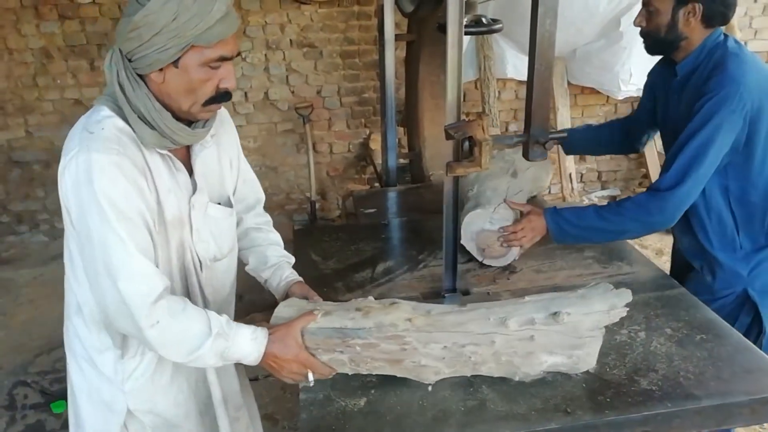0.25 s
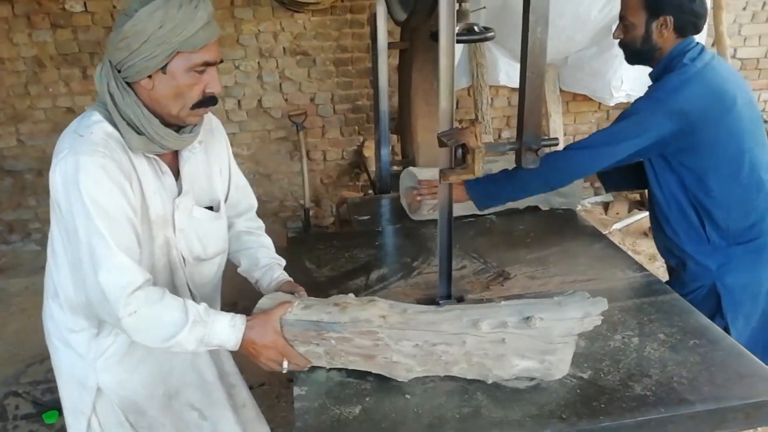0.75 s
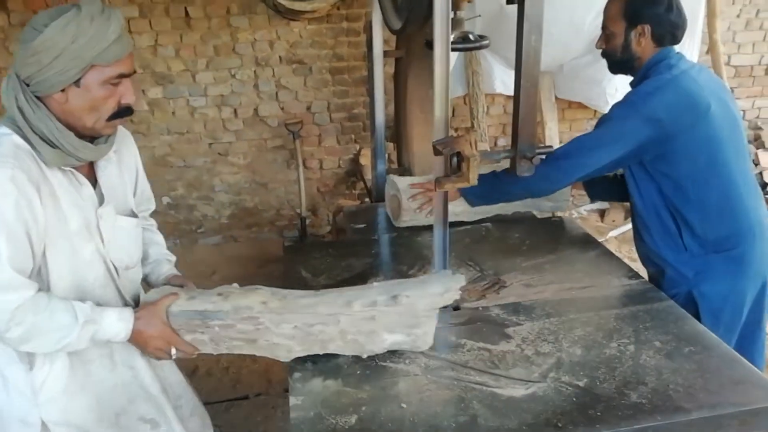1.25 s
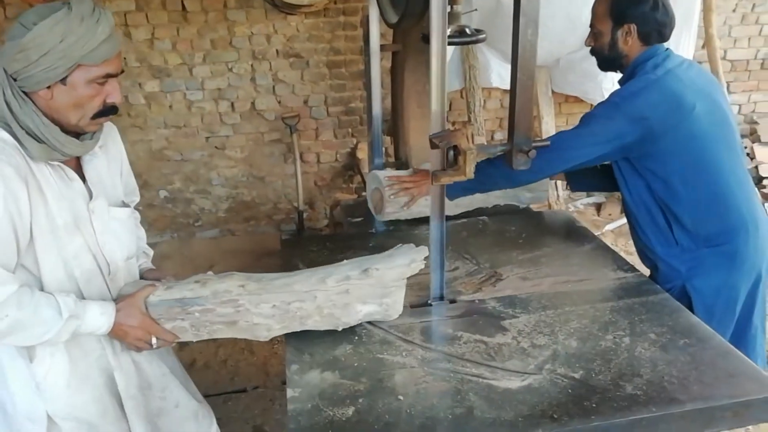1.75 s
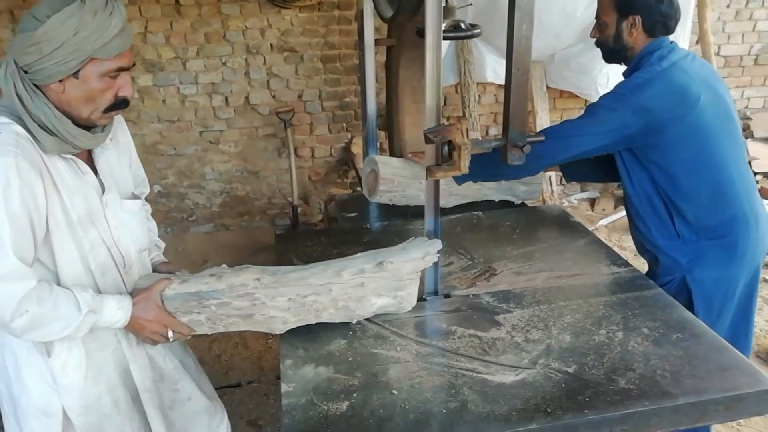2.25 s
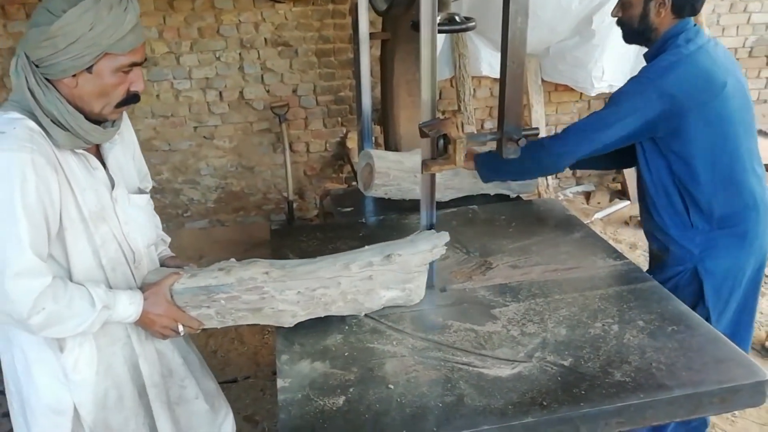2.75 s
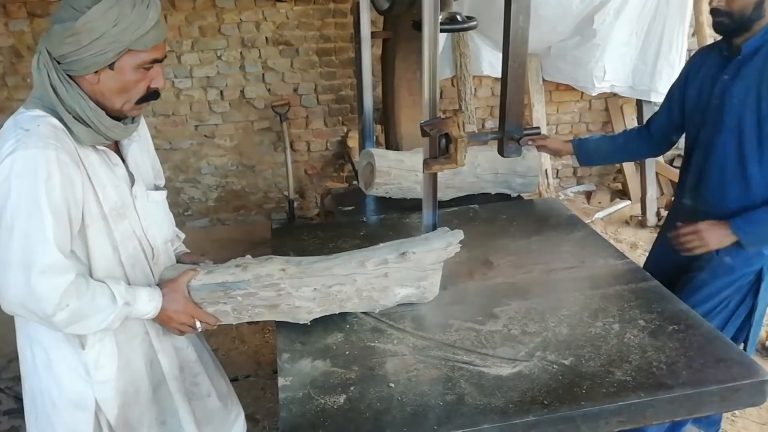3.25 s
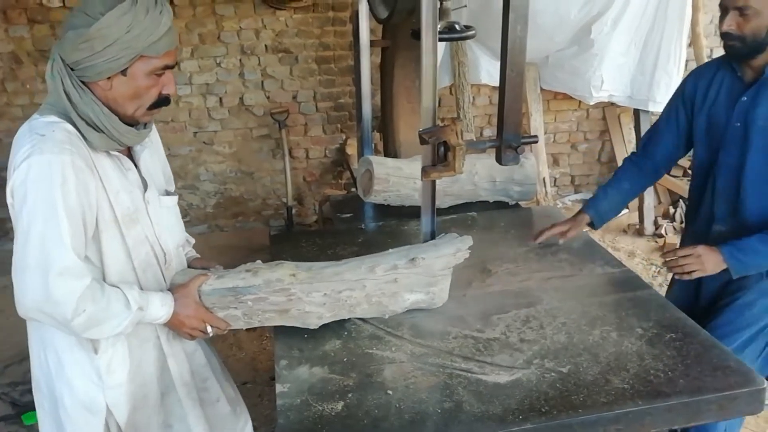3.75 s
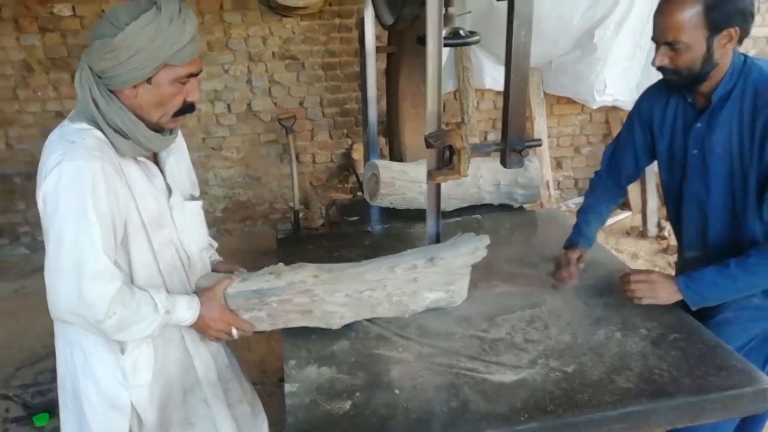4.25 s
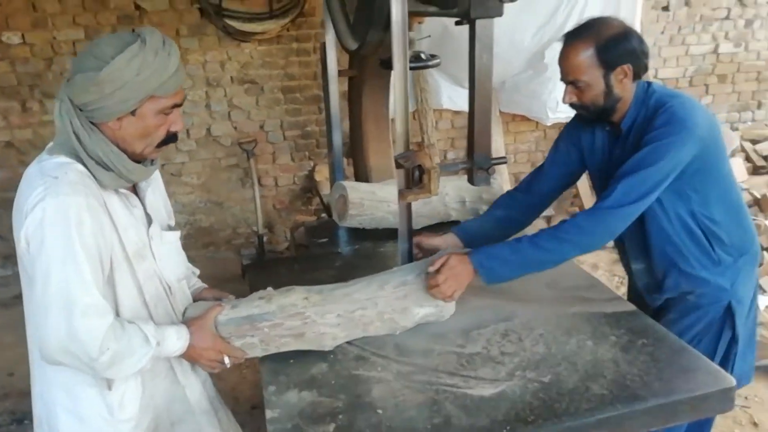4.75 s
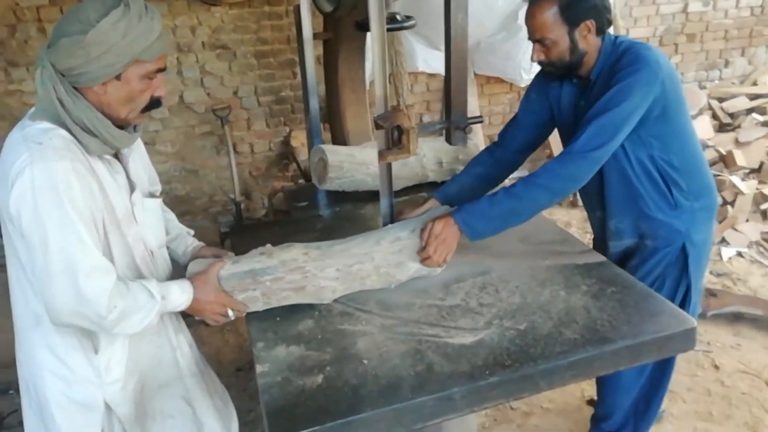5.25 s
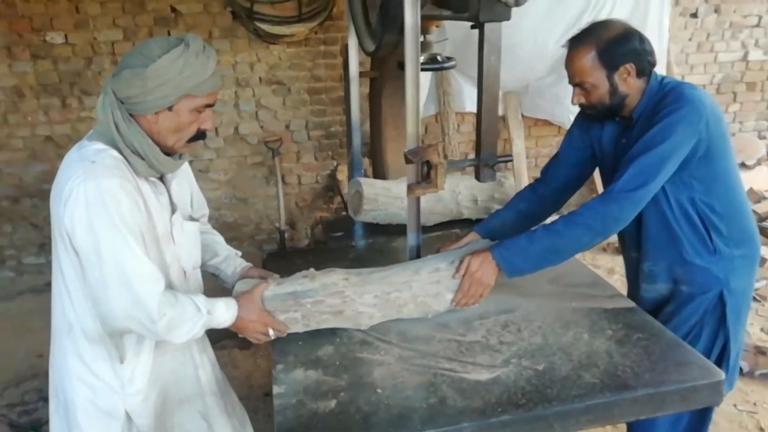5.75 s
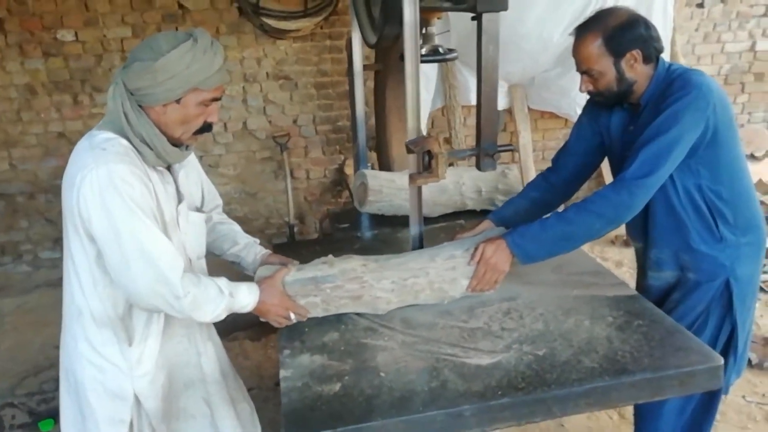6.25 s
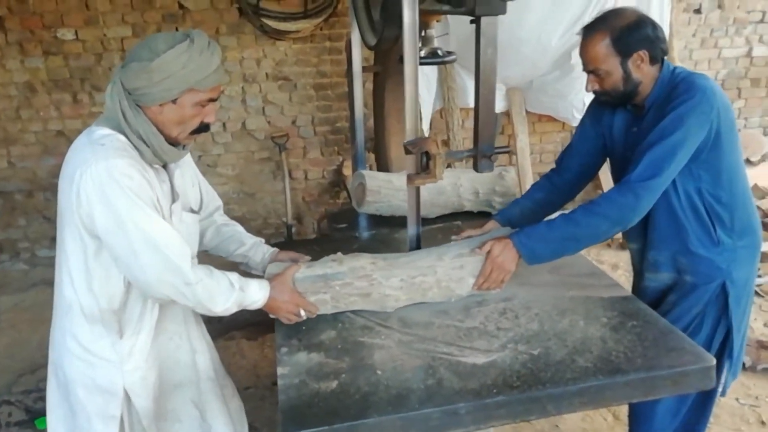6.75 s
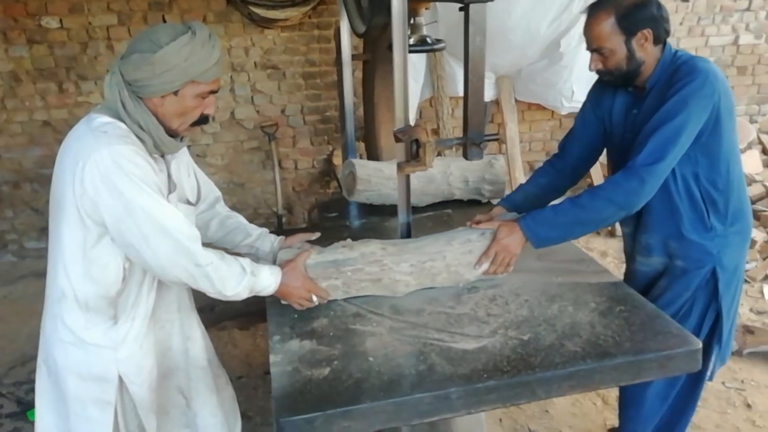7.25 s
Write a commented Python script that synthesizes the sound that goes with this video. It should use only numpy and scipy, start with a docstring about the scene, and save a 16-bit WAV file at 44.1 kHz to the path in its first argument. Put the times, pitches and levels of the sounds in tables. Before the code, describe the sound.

From 0 s a big band saw is already running close by in an open brick shed. Its blade hisses brightly, throbbing roughly eight times a second, and squeals around 3.5 kHz, mostly left, with fleeting pure chirps and a small pitch sag about four times a second. The steel table rings and whistles faintly, guides chatter, and a low drone and hum lie beneath. Soft wooden knocks come near 1.4 and 1.9 s; at 2.3 s the airy hiss opens up brighter, with dull phone bumps at 2.5-2.9 s. The drone climbs until, at 3.87 s, the teeth hit the log with a short hard knock. Squeal drops back; a harsh, grainy rasp around 5-6 kHz takes over on the left, with more central dust spray. A thin tooth whine grows, strongest near 6 s, as the rasp and table briefly ease around 6.25 s. Cutting continues to 7.5 s, slowing slightly.

```python
"""An open brick workshop: a big band saw runs close to a hand-held phone and a log is fed into it.
The blade hisses with each turn of the wheels (filtered noise) and squeals in its guides (shaken resonances
and brief locked tones), sagging in pitch on every lap of its loop. The teeth catch the wood with a knock,
then rasp (noise gated at the tooth rate), whine (its harmonics) and throw dust (bright, grainy noise).
The table rings, the guides chatter, the frame drones, the drive hums, and soft bumps reach the phone."""
import sys
import numpy as np
from scipy import signal
from scipy.fft import rfft, irfft, next_fast_len
from scipy.io import wavfile
from scipy.ndimage import map_coordinates

SR = 44100
rng = np.random.default_rng(int(sys.argv[2]) if len(sys.argv) > 2 else 0)


def to_wav(s):
    """Save 16-bit WAV."""
    ch = np.atleast_2d(s).T  # columns
    pcm = np.round(np.clip(ch, -1, 1) * 32767)  # PCM
    wavfile.write(sys.argv[1], SR, pcm.astype(np.int16))


N = 331169
T = np.arange(N) / SR

# speed of the band wheels, gradually slowing: (time [s], speed [turns/s])
WHEEL_SPEED = [(0, 8.33), (2, 8.23), (3, 8.23), (4, 8.16), (5, 8.1), (6, 7.97), (7.5, 7.9)]
# blade rubbing in its guides, levels before each layer's own gain:
# (time [s], squeal level [dB], squeal left minus right [dB], sliding hiss level [dB])
GUIDE_RUB = [(0, -18.5, 11.5, -27), (2.2, -19.5, 9.5, -26), (3.2, -20, 8.5, -26.5), (4, -26, 8.5, -27.5),
             (5.2, -26.5, 2, -28), (6.2, -26, 8, -31.5), (7.5, -26.5, 5, -29)]
# the phone turns towards the saw: (time [s], delay of the left microphone [ms], table whistle level [dB],
# table ring base level [dB], chatter base level [dB], chatter left minus right [dB])
PHONE_AIM = [(0, 0.14, -40, -33.5, -36, 4), (2.2, 0.13, -41, -34, -35.5, 6),
             (3.7, 0.11, -52, -36.5, -39.5, 4), (4.6, 0.038, -59, -37.5, -38.5, 3),
             (7.5, 0.042, -56, -39, -39, 1)]
# the frame's drone and the drive: (time [s], drone base level [dB], centre [Hz], gain of the hum [dB])
FRAME_DRONE = [(0, -50, 132.1, -4), (2.3, -45.5, 133, -3), (3.3, -43, 164.4, -5.5), (3.95, -38, 190, -6),
               (5.2, -44, 183, 1.5), (6.3, -49, 170.5, -3), (7.5, -44, 167.7, -7.5)]
# the log meets the teeth: time and rise of the cut
BITE_S, BITE_RISE_S = 3.85, 0.034


def wheel_throb(start_turn, second, uneven, flutter, flutter_hz):
    """The wheels run out of true and press the blade into its guides each turn, unevenly; the band flutters."""
    angle = phase(curves(WHEEL_SPEED)[0]) + 2 * np.pi * start_turn
    beat = np.cos(angle) + second * np.cos(2 * angle + 1.9)
    flapping = filtered(rng.standard_normal(N),
                        lambda f: 1 / (1 + (f / flutter_hz - flutter_hz / f) ** 2))
    return beat * (1 + uneven * wander(2)) + flutter * flapping


def lap_angle(at_lap):
    """Angle of the blade round its loop, zero at the given place in the lap (0-1)."""
    laps_per_turn = 0.466  # the blade loop is longer than a wheel's rim
    return laps_per_turn * phase(curves(WHEEL_SPEED)[0]) - 2 * np.pi * at_lap


def lap_throb(at_lap, first, half_at_lap, second):
    """Uneven stretches of the blade rub harder, once and twice a lap."""
    return first * np.cos(lap_angle(at_lap)) + second * np.cos(2 * lap_angle(half_at_lap))


def blade_bend(drift):
    """Relative change of the blade's pitch: a slack stretch sags it each lap, it drifts, and load sharpens it."""
    sag_at_lap, sag_depth, sag_sharpness = 0.78, 0.0371, 1.2  # depth as a share of the pitch
    load_sharp = 0.006  # share of the pitch
    sag = np.exp(sag_sharpness * (np.cos(lap_angle(sag_at_lap)) - 1))
    return -sag_depth * (sag - sag.mean()) + drift * wander(8.52) + load_sharp * load()


def squeal(ring_db, chirp_db, duck_db, flicker_db, ring_bend):
    """Friction shakes the blade's bending modes; in short spells it locks into one sliding tone."""
    # bending modes of the blade: (frequency [Hz], width [Hz], relative level [dB])
    blade_modes = [(3170, 220, -21), (3482, 115, 1.5), (3635, 133, -.3), (3790, 180, -4.5),
                   (4170, 560, -8.5)]
    level_db, side_db, _ = curves(GUIDE_RUB)
    bend = blade_bend(drift=0.002)
    tone, lock = chirps(bend, rough_hz=27, spell_hz=9, chance=0.38,
                        loaded_db=-3.5, loaded_at_lap=0.56, loaded_sharpness=1.8)
    # reading the ringing faster or slower slides the modes by part of the blade's bend
    place = np.cumsum(1 + ring_bend * bend)
    modes = np.array([map_coordinates(side, [place], order=3, mode="mirror")
                      for side in ring(blade_modes, alike=0.68)])
    # while the tone holds, it takes energy from the disorderly ringing
    shaken = modes * undb(ring_db - duck_db * lock + flicker_db * wander(34))
    locked = walls(tone, t60=0.13, wet_db=-11.0) * undb(chirp_db)
    return arrive((shaken + locked) * undb(level_db)) * pan(side_db)


def chirps(bend, rough_hz, spell_hz, chance, loaded_db, loaded_at_lap, loaded_sharpness):
    """A locked tone riding the blade's pitch, a higher one deep in the cut, and the first one's grip (0 to 1)."""
    # firmest spells in which the blade locks into one tone: (centre [s], half length [s])
    lock_spells = [(.27, .025), (.45, .03), (.70, .025), (0.814, .025), (.95, 0.027), (1.02, .025),
                   (1.557, 0.022), (1.85, 0.026), (2.05, 0.022), (2.25, .05), (2.94, .035), (3.04, 0.027),
                   (3.35, 0.035), (3.79, 0.029)]
    lock_hz, loaded_lock_hz = 3477, 3640  # before bend and roughness
    firm = sum(swell(s, half) for s, half in lock_spells)
    lock = np.clip(firm + chance * np.abs(wander(spell_hz)), 0, 1)
    free = lock * np.sin(phase(lock_hz * (1 + bend) + rough_hz * wander(158)))
    # the higher tone catches once a lap, just before the sag
    catch = np.exp(loaded_sharpness * (np.cos(lap_angle(loaded_at_lap)) - 1)) * ramp(4.6, 1.6)
    high = np.sin(phase(loaded_lock_hz + rough_hz * wander(160)))
    loaded = catch * undb(loaded_db + 2.5 * wander(3)) * high
    return np.sqrt(2) * (free + loaded), lock


def sliding(throb, gain_db, throb_db, side_db, flicker_db):
    """The steel band hisses through the guides."""
    # spectrum of the sliding hiss: (frequency [Hz], relative density [dB per Hz])
    slide_spectrum = [(1500, -30), (2200, -11), (2700, -8.5), (3200, -2.5), (3900, -1.5), (4600, 0.5),
                      (5500, -2.5), (6300, -7), (7000, -13.5), (7700, -20.5), (9500, -18.5), (14000, -31)]
    level_db = curves(GUIDE_RUB)[2] + gain_db + throb_db * throb + flicker_db * wander(22)
    return arrive(colour(noise(alike=0.15), slide_spectrum)) * undb(level_db) * pan(side_db)


def spray(throb, throb_db, grain_db, side_db, sawdust_side_db, load_db, ease_db, flicker_db):
    """Air and fine dust leave the gullets in a bright, grainy hiss; the cut throws a second, more central jet."""
    # spectrum of the dust: (frequency [Hz], relative density [dB per Hz])
    dust_spectrum = [(4500, -34), (6000, -13.5), (7200, -16), (7700, -19), (8900, -17.5), (9700, -7),
                     (10700, -8), (12800, -6), (14000, -5.5), (14450, -2.5), (14800, -4.5), (15080, 3),
                     (15400, -11), (16000, -16.5)]
    # the air starts low and opens up in one quick step; base levels of the two jets
    air_db, sawdust_db, open_s, open_rise_s, open_db = -24, -23.5, 2.326, 0.09, 5
    air = undb(air_db + open_db * ramp(open_s, open_rise_s) + load_db * load()) * pan(side_db)
    sawdust = undb(sawdust_db) * load() * pan(sawdust_side_db)
    jets = np.hypot(air, sawdust)  # unrelated jets add in power
    grains = noise() * undb(grain_db * wander(500))
    motion = undb(throb_db * throb + ease_db * ease() + flicker_db * wander(26))
    return colour(grains, dust_spectrum) * jets * motion


def cutting(throb, jitter, bite, throb_db, side_db, flicker_db, ease_db):
    """Each tooth tears off a chip: a rasp pulsing at the tooth rate, and a whine on its harmonics."""
    # harmonics of the tooth rate: (multiple, relative level [dB], left minus right [dB])
    tooth_lines = [(1, -16.5, 0), (2, -10, 15), (3, -1, 9)]
    # spectrum of the rasp: (frequency [Hz], relative density [dB per Hz])
    rasp_spectrum = [(2800, -32), (3700, -13.5), (4500, -11), (5000, -3.5), (5400, 0), (5950, -0.5),
                     (6400, -5.5), (7000, -15), (7700, -24), (9500, -17)]
    # whine of the teeth, before throb: (time [s], level [dB])
    whine_level = [(0, -54), (2.2, -50), (2.4, -45), (3.5, -43), (4.6, -35), (5.9, -26), (6.7, -31.5),
                   (7.5, -30)]
    tooth_hz = 1822  # mean rate
    # the rasp starts at a base level and grows as the blade sinks in
    rasp_db, rasp_db_per_s = -21.2, 0.6
    depth = load() * undb(rasp_db + rasp_db_per_s * (T - BITE_S) + ease_db * ease())
    tooth = phase(tooth_hz * (1 + jitter * wander(65) + 0.001478 * wander(6.95)))
    chips = colour(noise() * (1 + bite * np.cos(tooth)), rasp_spectrum)
    rasp = walls(chips, t60=0.1, wet_db=-7.5) * depth * pan(side_db)
    whine = sum(np.sin(round(k) * tooth) * undb(db + flicker_db * wander(15.0)) * pan(lean)
                for k, db, lean in tooth_lines)
    return (rasp + whine * undb(curves(whine_level)[0])) * undb(throb_db * throb)


def crack(level_db, start_s, decay_s, side_db):
    """The first teeth catch the log and slap it onto the table: a short burst of noise."""
    # spectrum of the cracking wood: (frequency [Hz], relative density [dB per Hz])
    crack_spectrum = [(190, 2), (340, -4), (700, -7), (2000, -22), (6000, -40)]
    burst = colour(noise(alike=0.57), crack_spectrum) * blow(start_s, decay_s)
    return burst * undb(level_db) * pan(side_db)


def machine(throb, shed_db, throb_db, chatter_throb_db, heave_db, ease_db):
    """Table, guides, frame and drive sound together in the shed; the steel parts echo off the walls."""
    # the log jogs the steel table: (time [s], half length [s], extra level [dB])
    table_jogs = [(0.807, 0.16, 2.5), (1.38, 0.024, 6), (1.89, .04, 5)]
    _, whistle_db, table_db, _, _ = curves(PHONE_AIM)
    table_db = table_db + ease_db * ease() + sum(db * swell(s, half) for s, half, db in table_jogs)
    plate = table_ring(table_db + throb_db * throb)
    rattle = guide_chatter(throb, chatter_throb_db, ease_db)
    steel = walls(plate + rattle, t60=0.09, wet_db=-7) + table_whistle(whistle_db)
    # the shed's noise follows the table's level in part
    return arrive(steel) + frame_drone(heave_db) + drive_hum() + shed_noise(shed_db + 0.76 * table_db)


def table_ring(level_db):
    """The steel table rings in a few broad modes, each shaken by noise."""
    # modes of the steel table: (frequency [Hz], width [Hz], relative level [dB])
    table_modes = [(791, 190, -4), (951, 163, -1.5), (1059, 114, -0.5), (1374, 106, -9)]
    return ring(table_modes, alike=0.67) * undb(level_db)


def table_whistle(level_db):
    """The table whistles on one narrow, unsteady tone."""
    return narrow_band(np.full(N, 1053), spread_hz=7) * undb(level_db)


def guide_chatter(throb, throb_db, ease_db):
    """The blade chatters in its guides: mid-band noise with louder bouts."""
    # spectrum of the chatter: (frequency [Hz], relative density [dB per Hz])
    chatter_spectrum = [(900, -27), (1300, -6), (1600, -1.5), (1850, -2), (2100, -2.5), (2500, -22),
                        (3300, -45)]
    # bouts of chatter: (time [s], half length [s], extra level [dB])
    chatter_bouts = [(1.37, .12, 1), (2.5, 0.2, 3), (4.57, .13, 3.5), (5.32, 0.22, 3), (6.659, .12, 3.5)]
    *_, level_db, side_db = curves(PHONE_AIM)
    bouts_db = sum(db * swell(s, half) for s, half, db in chatter_bouts)
    level_db = level_db + ease_db * ease() + bouts_db + throb_db * throb + 1.6 * wander(18)
    return colour(noise(alike=0.94), chatter_spectrum) * undb(level_db) * pan(side_db)


def frame_drone(heave_db):
    """The frame drones in two rough bands that climb until the log meets the teeth, sink back, and heave
    twice a lap."""
    level_db, centre_hz, _ = curves(FRAME_DRONE)
    heave = heave_db * np.cos(2 * lap_angle(0.43))
    bands = narrow_band(centre_hz, spread_hz=23) + undb(-0.5) * narrow_band(0.9 * centre_hz, spread_hz=72)
    return bands * undb(level_db + heave)


def drive_hum():
    """The drive hums on low tones that waver in level and pitch."""
    # tones of the drive: (mean frequency [Hz], base level [dB])
    hum_tones = [(63, -60), (130, -53.5), (198, -50.5), (263, -53), (333, -57.5), (397, -60)]
    hum = sum(np.sqrt(2) * undb(db + 4.7 * wander(9.3)) * np.sin(phase(hz + 3 * wander(12.3)))
              for hz, db in hum_tones)
    return undb(curves(FRAME_DRONE)[2]) * hum


def shed_noise(level_db):
    """Dull noise in the shed: long waves reach both microphones alike, shorter ones differ."""
    # spectrum of the shed: (frequency [Hz], relative density [dB per Hz])
    shed_spectrum = [(20, -8), (45, 0.5), (80, -16), (130, -3.5), (250, 0), (340, -3.5), (450, -6),
                     (560, -6.5), (700, -7.5), (1200, -4.5), (2500, -19), (6000, -38)]
    short_waves = filtered(rng.standard_normal(N), lambda f: f ** 4 / (f ** 4 + 330 ** 4))
    apart = short_waves * np.array([[0.95], [-0.95]])
    return colour(rng.standard_normal(N) + apart, shed_spectrum) * undb(level_db)


def bumps():
    """Dull noise bumps on the phone's case and short ringing wooden knocks, the same on both sides."""
    # spectrum of a bump: (frequency [Hz], relative density [dB per Hz])
    bump_spectrum = [(20, -14), (45, -11), (68, 3.5), (110, -17), (200, -10.5), (400, -19.5), (900, -33),
                     (3000, -60)]
    # bumps on the case: (time [s], level before the envelope [dB], decay [s])
    case_bumps = [(2.535, -26.5, 0.034), (2.6, -27.5, 0.066), (2.68, -31.5, 0.073), (2.75, -34, .05),
                  (2.93, -35, 0.072), (3.868, -25, 0.013), (7.44, -31.5, .1)]
    # wooden knocks: (time [s], level before the envelope [dB], ring [Hz], decay [s])
    wood_knocks = [(0.01, -36, 131, 0.079), (1.34, -27.5, 263, 0.067), (1.35, -27.5, 191, 0.042),
                   (1.449, -33, 124, 0.087), (1.869, -29, 130, 0.09), (2.54, -26, 80, .014),
                   (2.601, -20, 115, .01), (2.945, -29, 70, .016), (3.869, -9.5, 147, 0.0037),
                   (3.872, -21, 650, 0.0025)]
    strokes = sum(undb(db) * blow(s, decay) for s, db, decay in case_bumps)
    case = colour(rng.standard_normal(N), bump_spectrum) * strokes
    wood = sum(undb(db) * blow(s, decay) * np.cos(2 * np.pi * hz * (T - s))
               for s, db, hz, decay in wood_knocks)
    return case + wood


def load():
    """0 while the blade runs free, 1 once it is in the wood."""
    return ramp(BITE_S, BITE_RISE_S)


def ease():
    """Rises to 1 where spray, rasp, table and chatter ease for a moment."""
    return swell(6.25, 0.45)


def arrive(x):
    """Sound from the saw reaches the left microphone a little later."""
    lag = curves(PHONE_AIM)[0] * SR / 1000  # samples
    left = map_coordinates(x[0], [np.arange(N) - lag], order=3, mode="nearest")
    return np.array([left, x[1]])


def walls(x, t60, wet_db):
    """The sound and its dense reflections from brick and roof, different on each side."""
    t = T[:SR // 2]
    tail = rng.standard_normal((2, len(t))) * undb(-60 * t / t60) * (t > 0.003)
    tail /= np.sqrt(np.sum(tail ** 2, axis=1, keepdims=True))
    wet = undb(wet_db)
    reflections = signal.fftconvolve(np.atleast_2d(x), tail, axes=1)[:, :N]
    return (x + wet * reflections) / np.hypot(1, wet)


def ring(modes, alike):
    """Steep resonances, each shaken by its own friction noise."""
    def mode(hz, width):
        # two equal resonators in a row; 1.51 restores the half-power width
        return filtered(noise(alike), lambda f: (1 + 1j * hz / width * (f / hz - hz / f) / 1.51) ** -2)
    return unit(sum(undb(db) * mode(hz, width) for hz, width, db in modes))


def narrow_band(hz, spread_hz):
    """A tone whose strength and phase tumble at random, spreading it to either side."""
    angle = phase(hz)
    return wander(spread_hz) * np.cos(angle) + wander(spread_hz) * np.sin(angle)


def noise(alike=0):
    """Noise at two microphones that have a share of their power in common."""
    alike = np.clip(alike, 0, 1)
    return np.sqrt(alike) * rng.standard_normal(N) + np.sqrt(1 - alike) * rng.standard_normal((2, N))


def wander(rate_hz):
    """Smooth chance with spread 1."""
    return filtered(rng.standard_normal(N), lambda f: 1 / (1 + (f / rate_hz) ** 4))


def colour(x, points):
    """Shape a sound by a spectrum that falls away below its first point."""
    hz, db = np.transpose(points)
    return filtered(x, lambda f: undb(np.interp(np.log(f), np.log(hz), db)) * np.minimum(f / hz[0], 1) ** 2)


def filtered(x, response):
    """Apply a response given as a function of frequency, then scale to rms 1."""
    size = next_fast_len(N + 8192)
    f = np.maximum(np.fft.rfftfreq(size, 1 / SR), 1)
    return unit(irfft(rfft(x, size) * response(f), size)[..., :N])


def blow(start, decay):
    """A soft rise and an exponential fall."""
    age = np.maximum(T - start, 0)
    return (1 - np.exp(-age / 0.0022)) * np.exp(-age / decay)


def ramp(start, rise):
    """From 0 to 1 in a straight line."""
    return np.clip((T - start) / rise, 0, 1)


def swell(centre, half_length):
    """A smooth hump of height 1."""
    return np.exp(-((T - centre) / half_length) ** 2)


def curves(table):
    """Each column of a table as a line through time."""
    s, *columns = np.transpose(table)
    return [np.interp(T, s, c) for c in columns]


def phase(hz):
    """Running angle of a moving frequency."""
    return 2 * np.pi * np.cumsum(hz) / SR


def pan(db):
    """Gains for left minus right in dB; the mean power of the two sides is doubled, whatever the lean."""
    gains = undb(np.array([np.atleast_1d(db), -np.atleast_1d(db)]) / 2)
    return 2 * gains / np.sqrt(np.sum(gains ** 2, axis=0))


def undb(db):
    """Decibels to gain."""
    return 10 ** (np.asarray(db) / 20)


def unit(x):
    """Scale to rms 1."""
    return x / np.sqrt(np.mean(x ** 2))


def scene():
    """The throb of wheels and blade loop drives the hiss, the cut, the ringing table and the chatter."""
    # brief spurts of the hiss: (time [s], extra level [dB])
    hiss_spurts = [(.43, 4), (.92, 2), (1.4, 1.5), (1.885, 0.5), (2.151, 3.5), (4.71, 1), (6.19, 2)]
    throb = (wheel_throb(start_turn=-0.66, second=0.3, uneven=0.2, flutter=0.5, flutter_hz=14)
             + lap_throb(at_lap=0.32, first=0.34, half_at_lap=0.18, second=0.23))
    spurts = undb(sum(db * swell(s, 0.011) for s, db in hiss_spurts))
    hiss = (sliding(throb, gain_db=4.5, throb_db=0.37, side_db=0.7, flicker_db=1.37)
            + spray(throb, throb_db=0.85, grain_db=1.0, side_db=-17, sawdust_side_db=-3.5,
                    load_db=-1.9, ease_db=-2, flicker_db=0.81))
    return (squeal(ring_db=0.8, chirp_db=1.0, duck_db=2.5, flicker_db=0.8, ring_bend=0.65)
            + walls(hiss * spurts, t60=0.1, wet_db=-9.5)
            + cutting(throb, jitter=0.00298, bite=0.25, throb_db=0.55, side_db=28,
                      flicker_db=3.0, ease_db=-0.6)
            + crack(level_db=-22, start_s=3.868, decay_s=0.011, side_db=5)
            + machine(throb, shed_db=-14.5, throb_db=0.86, chatter_throb_db=0.3, heave_db=2.0, ease_db=-2.5)
            + bumps())


def record(dry):
    """The phone cuts the top with a steep low-pass."""
    return signal.sosfilt(signal.ellip(12, 0.2, 70, 15750, fs=SR, output="sos"), dry)


dry = scene()
out = record(dry)
to_wav(out)
```